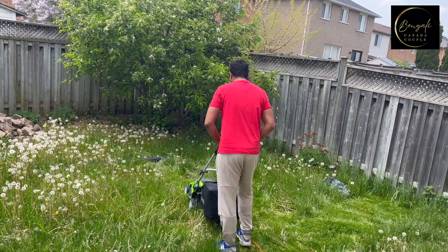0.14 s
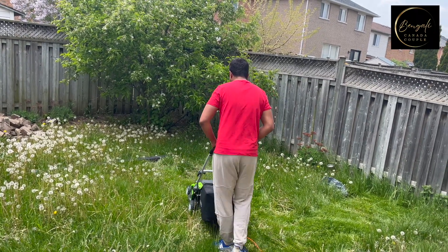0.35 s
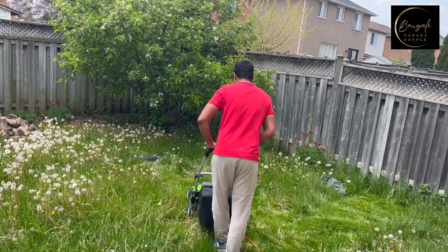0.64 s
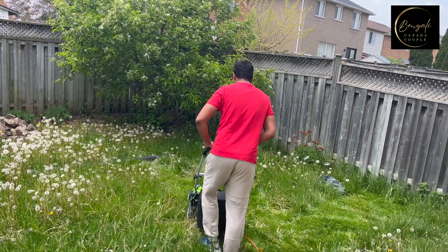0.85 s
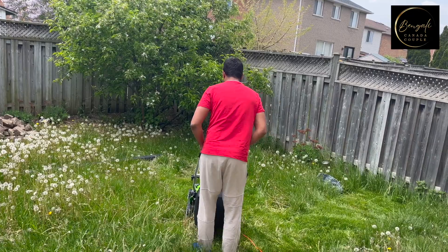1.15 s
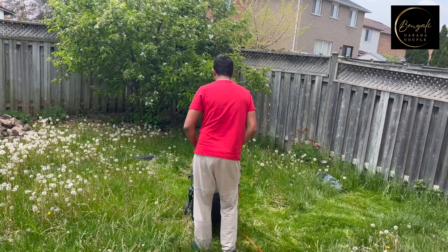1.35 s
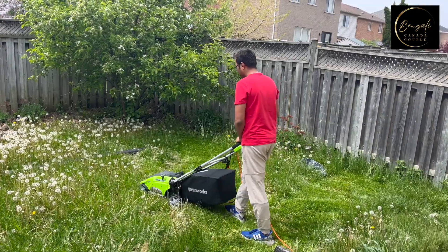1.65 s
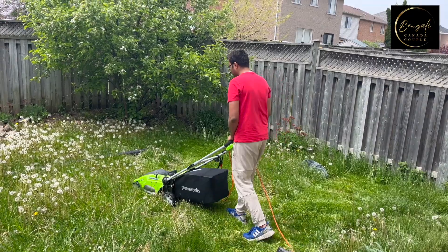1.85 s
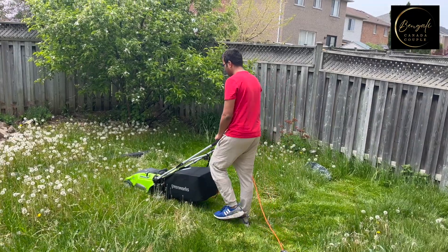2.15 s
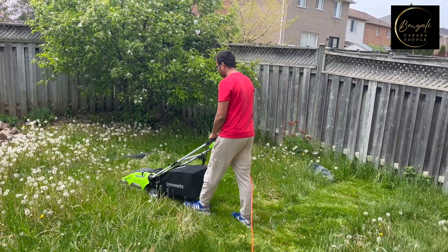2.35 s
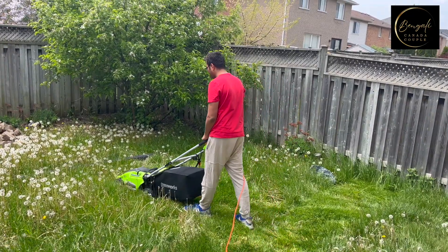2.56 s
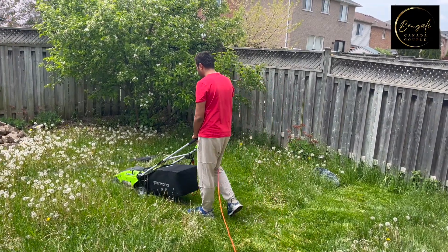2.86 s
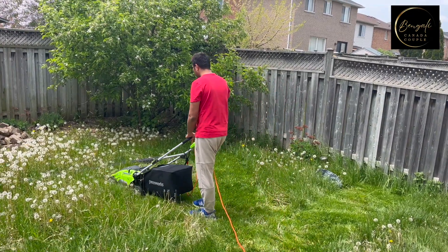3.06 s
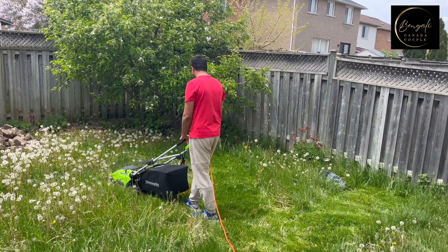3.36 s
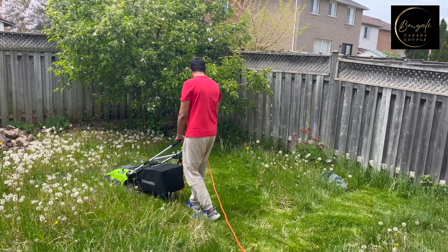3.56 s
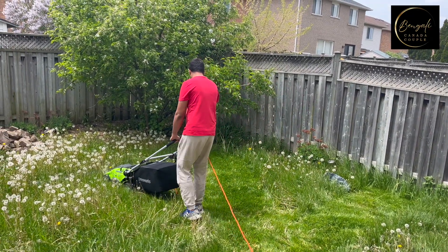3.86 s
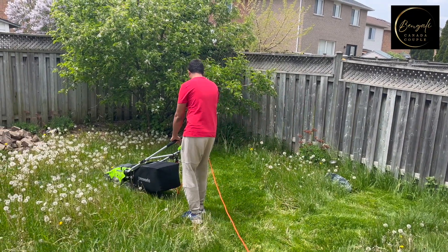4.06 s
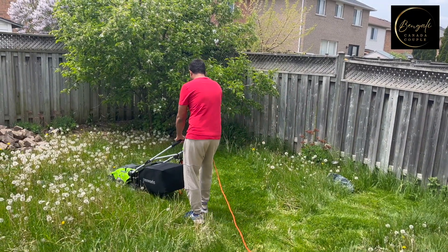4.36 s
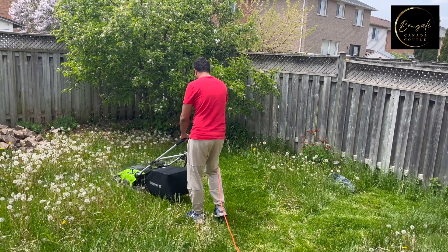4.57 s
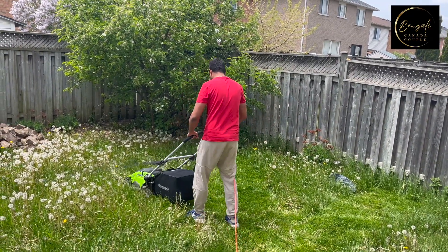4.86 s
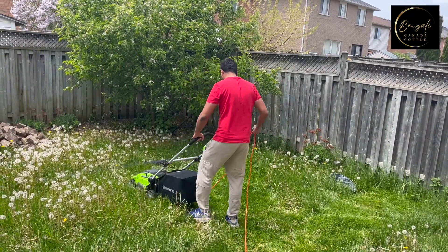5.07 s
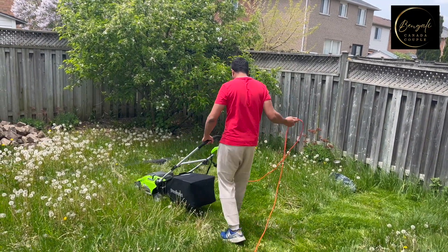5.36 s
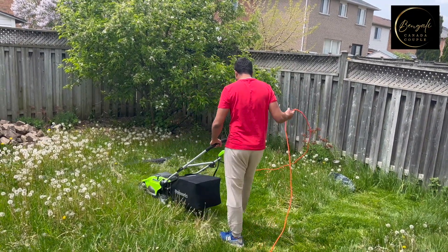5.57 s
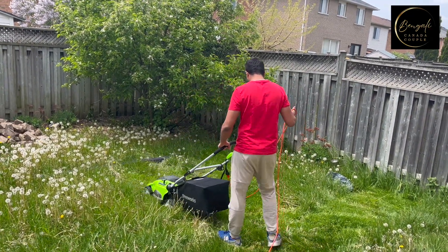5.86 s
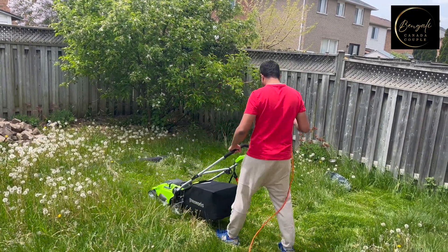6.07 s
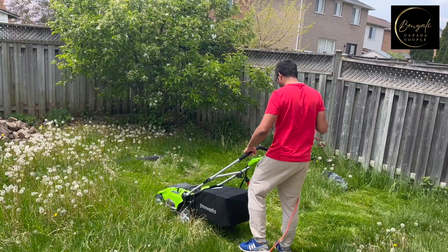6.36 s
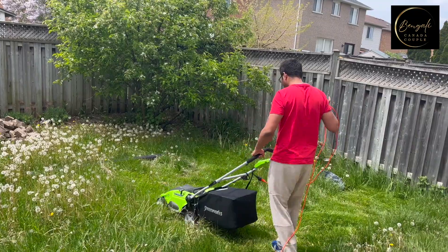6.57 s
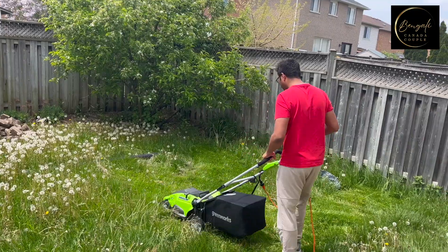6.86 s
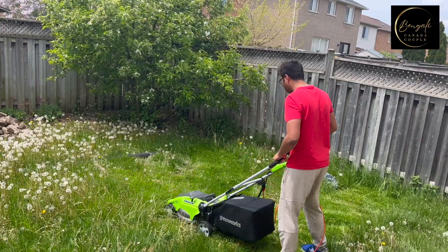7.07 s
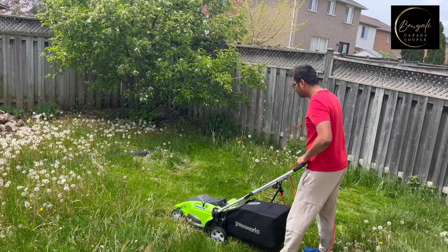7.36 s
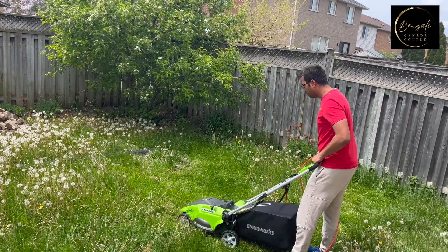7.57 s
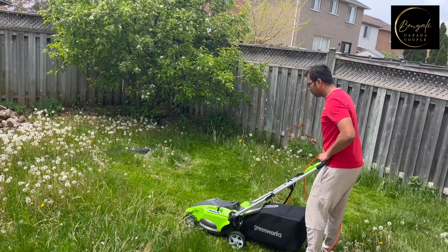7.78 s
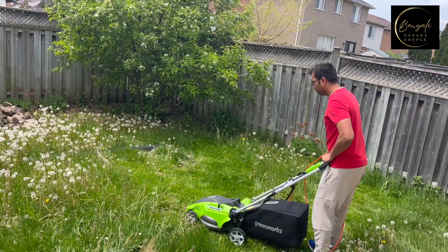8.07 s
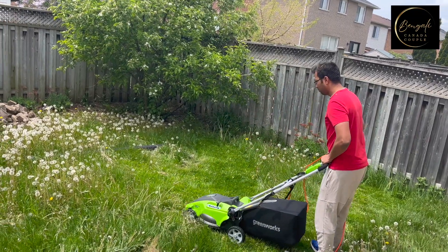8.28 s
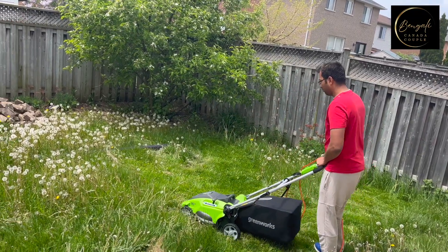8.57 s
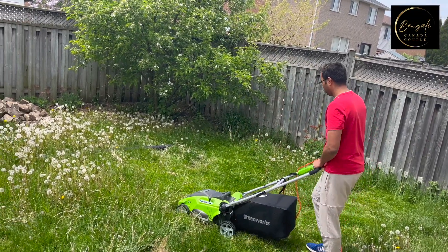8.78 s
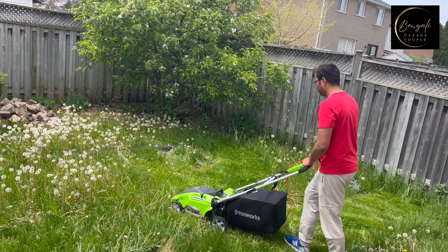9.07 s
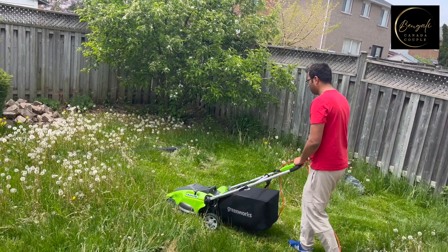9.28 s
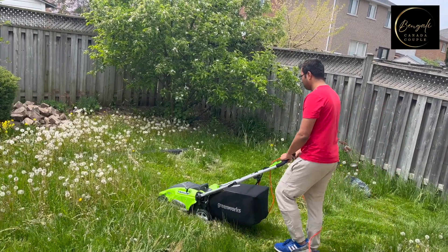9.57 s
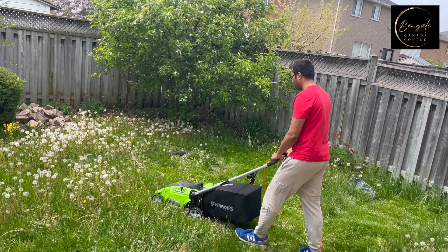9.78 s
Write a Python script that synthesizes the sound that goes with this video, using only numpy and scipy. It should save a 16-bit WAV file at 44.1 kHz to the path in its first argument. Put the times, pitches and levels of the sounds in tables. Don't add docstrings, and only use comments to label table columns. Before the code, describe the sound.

Steady electric lawn mower motor with airy deck roar, sagging in thick grass, crackling clippings and sharp stem ticks, one tiny gap early on.

```python
import sys
import numpy as np
from scipy import signal
from scipy.io import wavfile
from scipy.ndimage import uniform_filter1d

SR = 44100
rng = np.random.default_rng(int(sys.argv[2]) if len(sys.argv) > 2 else 0)


def makeup_ratio(level_db):
    decades = np.asarray(level_db, float) / 20
    return 10 ** decades


def generate_wav(signal):
    frames = np.transpose(np.atleast_2d(signal))
    scaled = np.clip(frames, -1, 1) * 32767
    pcm = np.round(scaled).astype(np.int16)
    wavfile.write(sys.argv[1], SR, pcm)


N = 437913

AIR_REF_DB = -37
TREBLE_HZ = 7200


def blade_hum(hz, levels_db):
    # (multiple of passing rate [1], level above the fifth [dB])
    upper = [(1.5, -7), (2.5, -16.5), (3.5, -16.5), (6, -2), (7, -6), (8, -15.5), (9, -9), (10, -10.5)]
    free_hz, breakup_db_per_hz = 132, .5
    strain_db = breakup_db_per_hz * np.maximum(free_hz - hz, 0)
    hum = np.zeros(N)
    for k, db in zip((.5, 1, 2, 3, 4, 5), levels_db):
        wobble_db = 0.29 * abs(k - 1) + .5 + strain_db * (k > 2)
        hum += tone(k * hz, db, wobble_db, rate_hz=19)
    fifth_db = uniform_filter1d(levels_db[-1], size=30000)
    for k, db in upper:
        hum += tone(k * hz, fifth_db + db, wobble_db=1.5 + strain_db, rate_hz=9)
    return hum


def hum_levels(hum_db, air_db, hidden_db):
    # (multiple [1], level at usual air [dB], share of the change in air [1], share of the hiding [1])
    lower = [(.5, -38.5, 0.24, -.3), (2, -35, 0.46, 0.2), (3, -39, 0.62, -0.77), (4, -39.5, 0.9, 0.41),
             (5, -39.5, 0.78, -0.68)]
    # (time [s], half length [s], multiple [1], depth [dB])
    fades = [(0.24, 0.067, 2, -20), (1.98, 0.15, 2, -11.5), (3.29, 0.29, 2, -10.5), (4.87, 0.25, 2, -12),
             (6.2, 0.16, 2, -8), (7.3, .07, 2, -10), (.9, 0.43, 3, -7), (1.42, .1, 3, -6),
             (2.41, 0.072, 3, -8), (3.4, .15, 3, -8), (4.395, .14, 3, -18), (5.43, 0.3, 3, -6.5),
             (6.4, 0.31, 3, -8), (7.5, 0.17, 3, -6.5), (8.56, 0.14, 3, -13), (0.86, 0.36, 4, -11),
             (3.02, 0.17, 4, -13), (2.3, 0.21, 4, -6), (5.85, 0.13, 4, -7), (4.2, 0.29, 4, -23),
             (5.08, 0.076, 4, -7), (8.65, 0.078, 4, -12), (0.38, 0.091, 5, -17), (1.98, 0.16, 5, -14),
             (4.2, 0.85, 5, -6), (4.95, 0.13, 5, -16), (7.92, 0.44, 5, -7), (7.5, .04, 5, -5),
             (8.97, 0.059, 5, -9), (9.15, 0.11, 3, -5)]
    levels = []
    for k, db, share, behind in lower:
        dips_db = sum(depth_db * swell(s, half_s) * (round(m) == k) for s, half_s, m, depth_db in fades)
        levels.append(db + share * (air_db - AIR_REF_DB) + behind * hidden_db + spread(dips_db))
    return [levels[0], hum_db, *levels[1:]]


def tip_beat(hz):
    turn = 2 * np.pi * np.cumsum(hz) / SR
    return np.cos(turn) + 0.22 * np.cos(turn / 2) + 0.51 * np.cos(2 * turn)


def deck_air(roar_db, beat):
    # (frequency [Hz], density [dB per Hz])
    wash_spectrum = [(25, -16), (70, 5.5), (100, 4.5), (200, -0.5), (330, -6), (450, -25), (700, -36),
                     (3000, -73)]
    # (frequency [Hz], density [dB per Hz])
    roar_spectrum = [(200, -26), (330, -5.5), (600, -3.5), (900, -0.5), (1200, -1.5), (1600, -11.5),
                     (2500, -17), (9000, -48)]
    air = rng.standard_normal(N)
    wash_db = -42 + 0.38 * (roar_db - AIR_REF_DB) + 0.62 * drift(5)
    wash = colour(air, wash_spectrum, 145, 225, patchy_db=0.9) * makeup_ratio(wash_db)
    roar = colour(air, roar_spectrum, 700, 1200, patchy_db=0.0) * makeup_ratio(roar_db + 1.44 * beat)
    return wash + roar


def grass_levels(turned_db, hidden_db):
    # (time [s], half length [s], level of clippings [dB])
    tuft_events = [(0.207, .08, -57), (.7, 0.092, -51), (1.12, .22, -53), (1.43, 0.028, -42.5),
                   (1.626, 0.089, -51), (1.825, .14, -45), (2.287, 0.12, -47), (2.55, .08, -47.5),
                   (2.756, 0.106, -41.5), (3.013, 0.17, -43.5), (3.414, .11, -48.5), (3.617, 0.12, -45),
                   (3.943, 0.063, -45.5), (4.34, 0.063, -47), (4.78, 0.045, -47), (5.08, 0.045, -52),
                   (5.35, 0.11, -46), (5.82, 0.061, -47.5), (5.993, 0.091, -45.5), (6.206, 0.041, -48),
                   (6.475, 0.083, -42), (6.916, .16, -45), (7.275, 0.083, -42.5), (7.47, 0.12, -45),
                   (8.41, .2, -50), (8.863, .15, -45.5), (9.34, 0.096, -44.5), (9.5, .06, -40.5),
                   (9.691, 0.041, -39.5), (9.85, .11, -45)]
    # (time [s], half length [s], rise of chopping [dB])
    stalks = [
        (2.765, 0.016, 4),
        (3.462, 0.023, 3.5),
        (6.173, 0.015, 9),
        (6.46, .06, 3),
        (9.69, 0.027, 3),
    ]
    spray_floor_db, chop_floor_db = -52.5, -42.5
    tufts = spread(sum(makeup_ratio(2 * db) * swell(s, half_s) for s, half_s, db in tuft_events))
    spray_db = 10 * np.log10(makeup_ratio(2 * (spray_floor_db + hidden_db)) + tufts)
    chop_db = chop_floor_db + hidden_db + 0.21 * (spray_db - spray_floor_db) + 0.17 * turned_db
    chop_db = chop_db + spread(sum(db * swell(s, half_s) for s, half_s, db in stalks))
    return chop_db, spray_db


def cut_grass(roar_db, hidden_db, beat):
    # (frequency [Hz], density [dB per Hz])
    chop_spectrum = [(500, -20), (1500, 7), (2000, -2), (3000, 3.5), (3700, -2), (4300, -2.5), (5300, -4.5),
                     (6500, -12), (8000, -8.5), (12000, -33)]
    # (frequency [Hz], density [dB per Hz])
    spray_spectrum = [(3000, -8.5), (6000, -1), (7700, 0), (9300, 1), (11000, -1.5), (13500, -3.5),
                      (15600, -1.5), (16000, -48)]
    turned_db = roar_db - AIR_REF_DB
    chop_db, spray_db = grass_levels(turned_db, hidden_db)
    ring = np.full(N, 4320), 2 + .9 * turned_db
    clumps_db = 0.61 * drift(30)
    stems = chips(per_s=2500, spread_db=1.0, ring_s=0.00072) + 0.65 * rng.standard_normal(N)
    chop = colour(stems, chop_spectrum, 1520, 8400, patchy_db=-0.3, ring=ring)
    chop = chop * makeup_ratio(chop_db + 0.76 * beat + clumps_db)
    spray = colour(stems, spray_spectrum, 9500, 13600, patchy_db=1.5)
    spray = spray * makeup_ratio(spray_db + 1.24 * beat + clumps_db)
    ground_lag_s = 0.001535
    bounce = (0.12 - 0.027 * turned_db) * np.roll(chop, round(ground_lag_s * SR))
    return chop + bounce + spray


def snaps():
    # (time [s], peak level [dB], dull part above it [dB])
    cracks = [(0.688, -29, -10), (1.6596, -28, -10), (2.1303, -27, -13), (2.4487, -30, -7),
              (2.654, -29, -11), (2.6632, -23.5, -16), (2.7497, -30, -11), (2.8144, -17, -17),
              (2.83, -22, -14), (2.8963, -27, -17), (3.44, -28, -9), (3.4535, -23, -12), (4.2815, -31, -11),
              (6.8347, -24, -7), (7.1065, -34, -4), (7.1819, -24, -7), (7.285, -25, -7), (7.5291, -35, -8),
              (7.562, -25, -7), (8.3193, -30, -1), (8.8406, -27, -7), (9.0836, -30, -2), (9.3305, -25, -8),
              (9.4223, -29, -6), (9.4394, -26, -11), (9.4862, -27, -7), (9.6702, -21, -12),
              (9.679, -18, -12), (9.766, -26, -11), (9.8358, -28, -4)]
    s, db, dull_db = np.transpose(cracks)
    out, signs = np.zeros(N), rng.choice([-1., 1.], N)
    knock = 2820, 4700, db + dull_db - 10.5, .004
    tick = 6000, 15500, db + 1.5, 0.0015
    for lo_hz, hi_hz, level_db, ring_s in (knock, tick):
        hits = np.zeros(N)
        hits[(s * SR).astype(int)] = makeup_ratio(level_db)
        burst = signal.oaconvolve(hits, np.exp(-np.arange(1200) / SR / ring_s))[:N] * signs
        out += signal.sosfilt(signal.butter(2, [lo_hz, hi_hz], "bandpass", fs=SR, output="sos"), burst)
    return out


def thump():
    # (centre [Hz], width [Hz], level [dB])
    knock = (900, 450, -30)
    hz, width_hz, db = knock
    time_s, half_s = 3.635, .035
    band = signal.butter(2, [hz - width_hz / 2, hz + width_hz / 2], "bandpass", fs=SR, output="sos")
    bell = np.exp(-((np.arange(N) / SR - time_s) / half_s) ** 2)
    return makeup_ratio(db) * bell * evened(signal.sosfilt(band, rng.standard_normal(N)))


def mower():
    # (time [s], blade passing rate [Hz], hum [dB], air in the deck [dB], cutting as hidden by the body [dB])
    takes = [
        [(0.0, 133.1, -26, -34.5, -2), (0.5, 132.1, -25, -33.5, -5), (1.37, 132.8, -27.5, -34, -4)],
        [(1.45, 132.1, -22.5, -40.5, 1), (1.7, 130.1, -23.5, -39.5, 0), (2.05, 126, -24.5, -42.5, 0),
         (2.46, 126.2, -23.5, -40, 0), (2.7, 124.6, -22, -41.5, 0.5), (3.2, 122.3, -21.5, -42, 1.5),
         (4.19, 123.4, -23, -40.5, 1), (4.57, 127.5, -20.5, -38, 0.5), (5.2, 131.1, -21.5, -36, -1),
         (5.94, 131.8, -23, -34, 0), (6.36, 129.1, -20.5, -35, 1), (7.5, 129.1, -19.5, -32.5, 1),
         (8.61, 132, -20, -33.5, 1), (9.6, 129.5, -20, -35, 1.5), (9.93, 124, -22.5, -41, 5)],
    ]
    hz, hum_db, air_db, hidden_db = curves(takes)
    beat = tip_beat(hz)
    hum = blade_hum(hz, hum_levels(hum_db, air_db, hidden_db))
    return hum + deck_air(air_db, beat) + cut_grass(air_db, hidden_db, beat) + snaps() + thump()


def whine():
    # (start [s], length [s], pitch [Hz], level [dB], level of the octave [dB])
    bouts = [(0.0, 0.29, 239.4, -22.5, -54), (0.386, 0.57, 241, -20, -57), (2.11, 0.94, 238.5, -34.5, -52),
             (2.701, 0.87, 237.1, -33.5, -42), (3.76, 0.94, 238.6, -32, -34),
             (4.314, 0.89, 235, -43.5, -37.5), (5.018, 0.95, 236.2, -27, -35),
             (6.45, 0.86, 238.2, -35, -40), (6.999, 1, 237.6, -30.5, -40), (7.6, 1.16, 237.2, -30.5, -36.5),
             (8.751, 0.49, 236.8, -30, -48), (9.15, 0.32, 236.5, -23.5, -45),
             (9.459, 0.53, 238.1, -32, -40)]
    t, rows = np.arange(N) / SR, np.array(bouts)
    latest = np.maximum(np.searchsorted(rows[:, 0], t, "right") - 1, 0)
    start, length, hz, db, octave_db = rows[latest].T
    age, rise = t - start, round(0.034 * SR)
    start_flat_hz, settle_s = 5.5, .12
    hz = uniform_filter1d(hz - start_flat_hz * np.exp(-age / settle_s), rise)
    fade_db, rest_db = -5, -56
    db, octave_db = (uniform_filter1d(np.where(age < length, c + fade_db * age / length, rest_db), rise)
                     for c in (db, octave_db))
    x = tone(hz, db, wobble_db=1.5, rate_hz=16) + tone(2 * hz, octave_db, wobble_db=-1.0, rate_hz=12)
    lead_s = 0.00046
    return np.array([x * makeup_ratio(-4.0), np.roll(x, -round(lead_s * SR)) * makeup_ratio(-1.5)])


def drone():
    # (time [s], pitch [Hz], level [dB])
    takes = [
        [(0.0, 53.18, -24), (1.37, 52.7, -24)],
        [(1.45, 52.08, -34), (5.49, 51.92, -29.5), (8.98, 51.9, -31), (9.2, 47.4, -36), (9.36, 49.5, -33),
         (9.6, 54, -26.5), (9.93, 53.2, -35)],
    ]
    return tone(*curves(takes), wobble_db=1.3, rate_hz=7.8)


def ports(x):
    # (frequency [Hz], direct share [1], phase lead [rad], left louder [dB])
    port_response = [(50, 1, -.03, -.3), (130, .999, -.2, -.9), (300, .95, -.5, -.9), (600, .75, -.7, 0),
                     (900, .88, -.9, .8), (1500, .8, -2.8, -3), (1610, .6, -3.9, -2), (1740, .4, -5.5, 6),
                     (2100, .7, -6.3, 1), (3300, .55, -7.3, 2), (3900, .25, -6.3, 3.5), (4700, .6, -6.9, 2),
                     (5400, .2, -8.5, 5), (6200, .6, -11.6, -1.5), (7000, .5, -10.9, -.5)]
    lag_s, zero_hz = 1.37e-4, 4700
    still_below_hz = 1400
    hz, _, z = signal.stft(x, SR, nperseg=1024, noverlap=768)
    hz = hz[:, None]
    share, lead, left_db = read(port_response, hz)
    treble = hz > TREBLE_HZ
    share = np.where(treble, 1, np.clip(share, 0, 1))
    lead = np.where(treble, 2 * np.pi * lag_s * (hz - zero_hz), lead)
    left_db = np.where(treble, 0, left_db)
    slow, quick = (patches(z.shape, 2, n) + 1j * patches(z.shape, 2, n) for n in (40, 5))
    scatter = np.exp(1j * np.angle(np.where(hz < still_below_hz, slow, quick)))
    right = z * (share * np.exp(1j * lead) + 1.44 * np.sqrt(1 - share ** 2) * scatter)
    both = [z * makeup_ratio(left_db / 2), right / makeup_ratio(left_db / 2)]
    return signal.istft(both, SR, nperseg=1024, noverlap=768)[1][:, :N]


def evened(x):
    return x / np.sqrt(np.mean(x ** 2) + 1e-20)


def curves(tables):
    s, *columns = np.concatenate(tables).T
    return [np.interp(np.arange(N) / SR, s, c) for c in columns]


def read(points, hz):
    f, *columns = np.transpose(points)
    return [np.interp(np.log(hz + 1), np.log(f + 1), c) for c in columns]


def swell(s, half_s):
    return np.exp(-((np.arange(0, N, 64) / SR - s) / half_s) ** 2)


def spread(x):
    return np.interp(np.arange(N), np.arange(0, N, 64), x)


def drift(rate_hz):
    knots = rng.standard_normal(600)
    return np.interp(np.arange(N) / SR * rate_hz, np.arange(len(knots)), knots) * 0.9


def patches(shape, bins, frames):
    across = uniform_filter1d(rng.standard_normal(shape), bins, axis=0)
    return evened(uniform_filter1d(across, frames, axis=1))


def tone(hz, db, wobble_db, rate_hz):
    phase = 2 * np.pi * (np.cumsum(hz) / SR + rng.random()) + 0.082 * wobble_db * drift(rate_hz)
    return np.sqrt(2) * makeup_ratio(db + wobble_db * drift(rate_hz)) * np.sin(phase)


def colour(x, spectrum, lo_hz, hi_hz, patchy_db, ring=None):
    hz, t, z = signal.stft(x, SR, nperseg=1024)
    z = z * makeup_ratio(read(spectrum, hz)[0][:, None] + patchy_db * patches(z.shape, 9, 7))
    if ring:
        ring_hz, lift_db = (c[np.minimum(t * SR, N - 1).astype(int)] for c in ring)
        z = z * makeup_ratio(lift_db * np.exp(-((hz[:, None] - ring_hz) / 450) ** 2))
    power = abs(z) ** 2
    share = power[(hz > lo_hz) & (hz < hi_hz)].sum() / power.sum()
    return evened(signal.istft(z, SR, nperseg=1024)[1][:N]) / np.sqrt(share)


def chips(per_s, spread_db, ring_s):
    size = makeup_ratio(spread_db * np.minimum(rng.exponential(1, N), 5)) * (rng.random(N) < per_s / SR)
    decay = np.exp(-np.arange(400) / SR / ring_s)
    power = abs(signal.oaconvolve(size ** 2, decay)[:N])
    return evened(np.sqrt(power) * rng.standard_normal(N))


def thinned_treble(x):
    # (frequency [Hz], level under the other [dB])
    weak_margin = [(8300, -9.5), (10600, -5.5), (13300, -3.8), (14600, -2.5)]
    hz, _, z = signal.stft([x[0] + x[1], x[0] - x[1]], SR, nperseg=1024)
    frames = z.shape[2]
    bands, band_hz = z[:, :512].reshape(2, 64, 8, -1), hz[:512].reshape(64, 8, 1)
    power = uniform_filter1d((abs(bands) ** 2).mean(2, keepdims=True), size=2, axis=3)
    flicker = np.repeat(rng.standard_normal(power.shape), 2, axis=3)[..., :frames]
    power = power * makeup_ratio(2.9 * flicker)
    top = uniform_filter1d((np.diff(x, 2, prepend=0, append=0) ** 2).sum(0), size=64)
    sharp = top > 8 * uniform_filter1d(top, size=4096)
    attack = np.resize(uniform_filter1d(sharp * 1., size=1024)[::512] > 1e-3, frames)
    strong = power > power[::-1] * makeup_ratio(2 * read(weak_margin, band_hz)[0][:, :1])
    kept = strong | (band_hz < TREBLE_HZ) | attack
    z[:, :512] = (bands * kept).reshape(2, 512, -1)
    z[1] *= np.exp(1j * patches(z.shape[1:], 4, 2) * (hz[:, None] > TREBLE_HZ) * ~attack)
    mid, side = signal.istft(z, SR, nperseg=1024)[1][:, :N] / 2
    return np.array([mid + side, mid - side])


def scene():
    return ports(mower() + drone()) + whine()


def top_cut(x):
    return signal.sosfilt(signal.butter(12, 15570, fs=SR, output="sos"), x)


def record(dry):
    t = np.arange(N) / SR
    out_s, in_s = 1.3815, 1.439
    before = np.clip((out_s - t) / 0.0044 + .5, 0, 1)
    after = np.clip((t - in_s) / 0.013 + .5, 0, 1) ** 2
    mix = thinned_treble(dry * (before + after))
    return top_cut(mix)


dry = scene()
out = record(dry)
generate_wav(out)
```